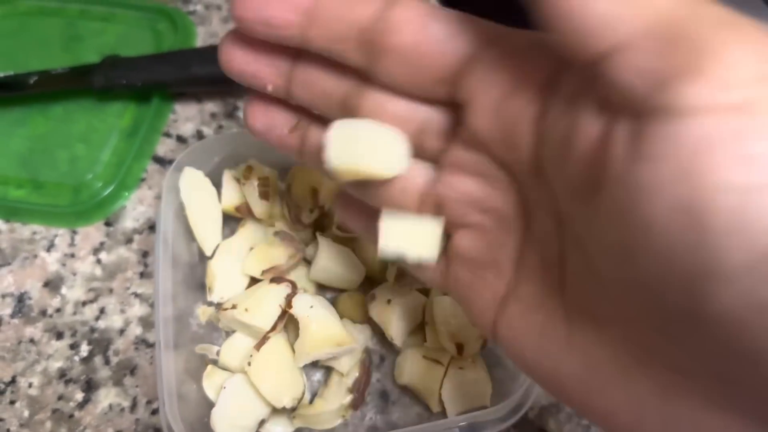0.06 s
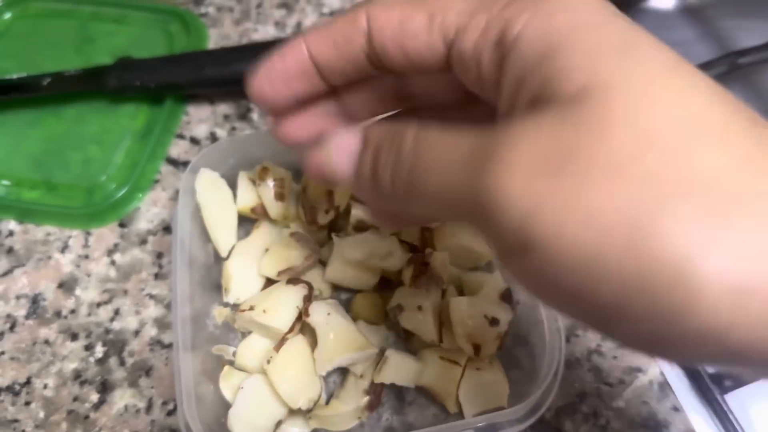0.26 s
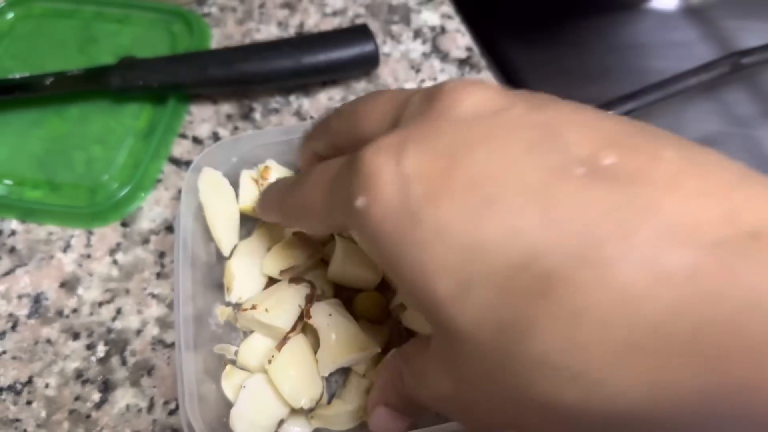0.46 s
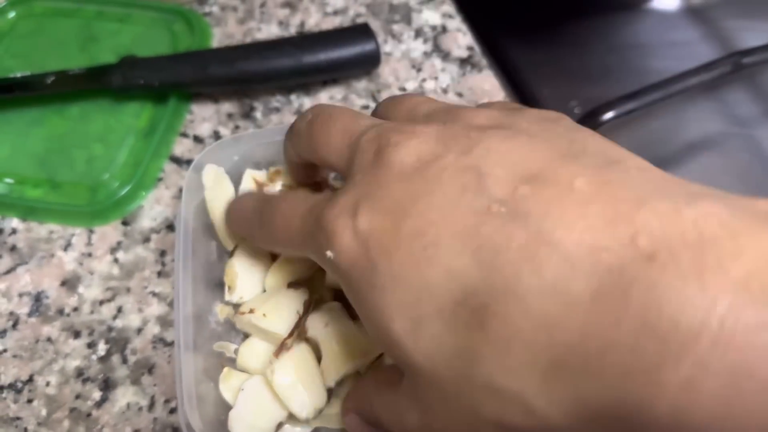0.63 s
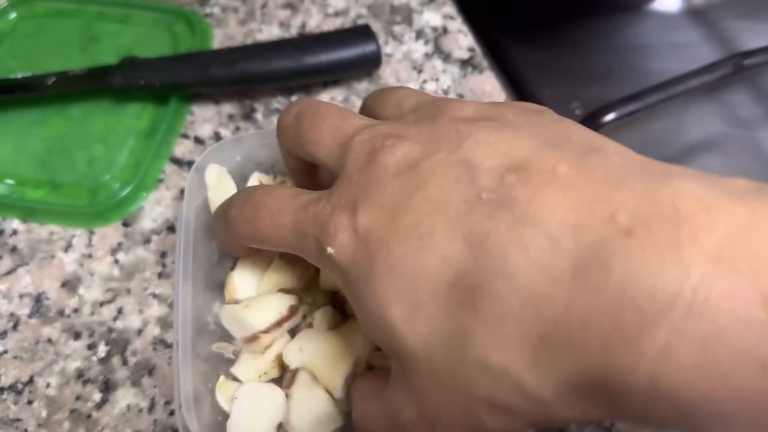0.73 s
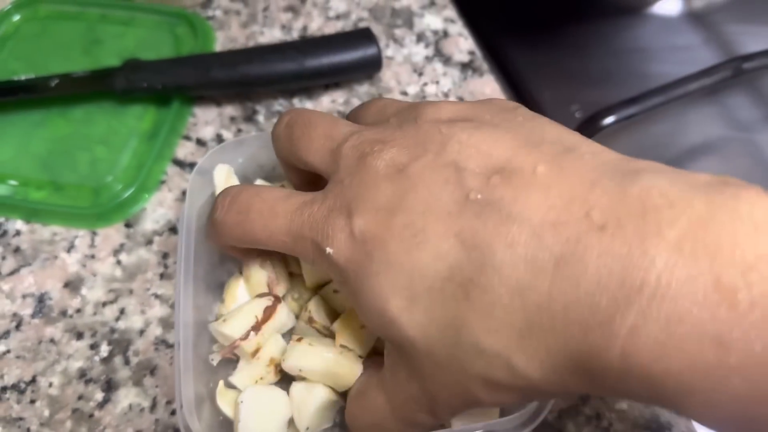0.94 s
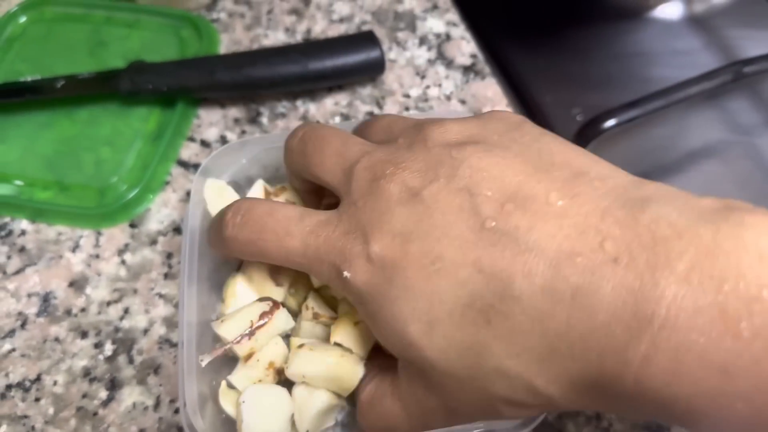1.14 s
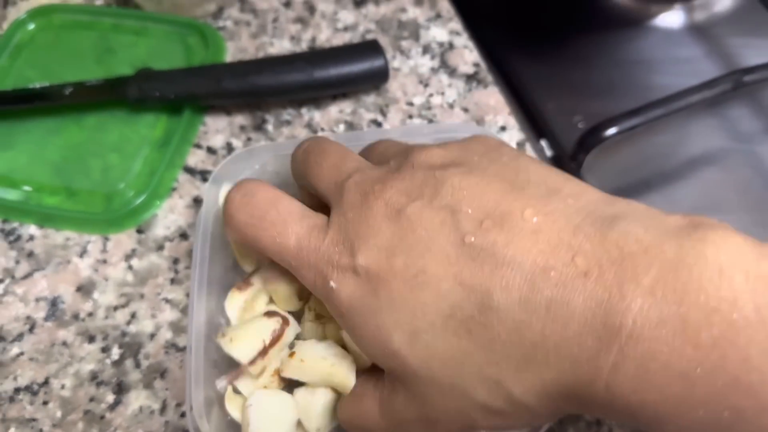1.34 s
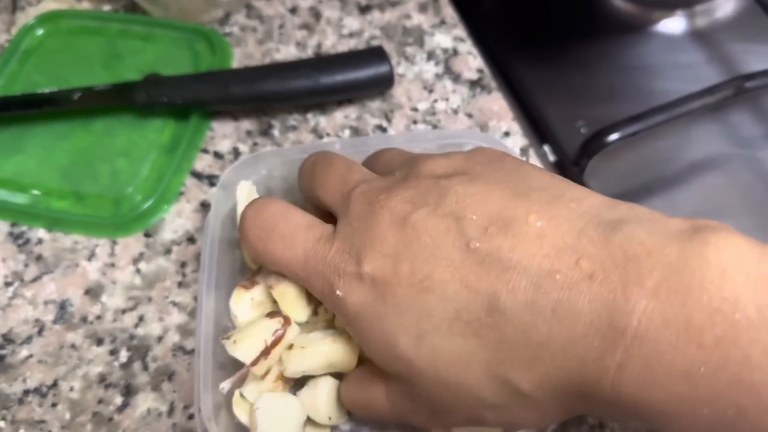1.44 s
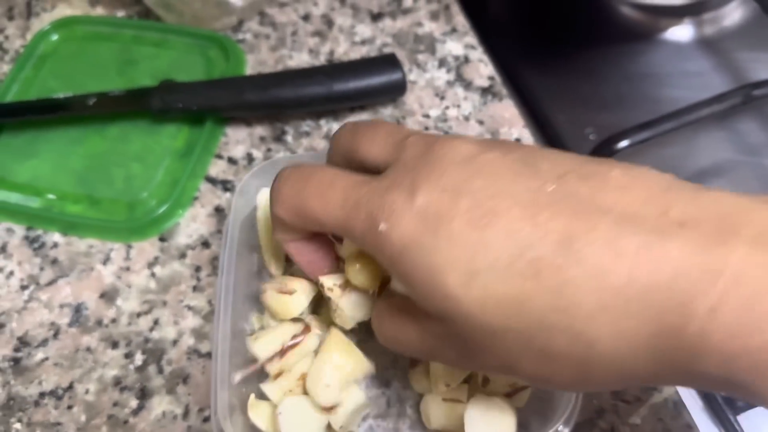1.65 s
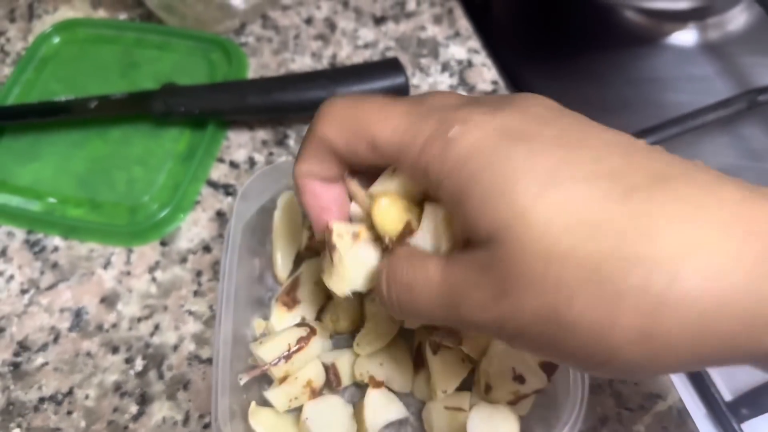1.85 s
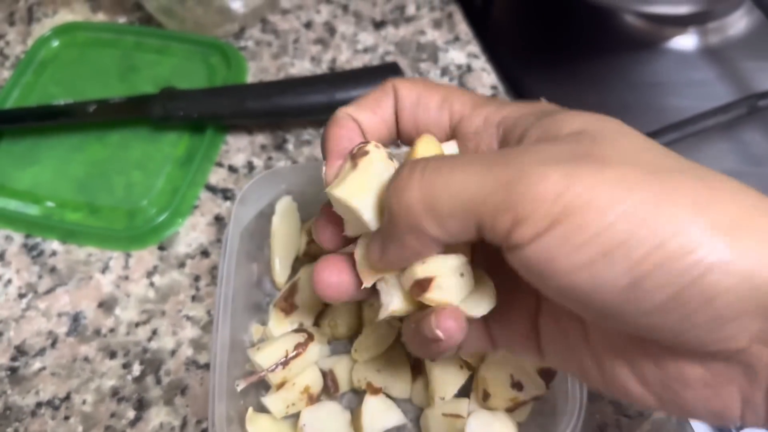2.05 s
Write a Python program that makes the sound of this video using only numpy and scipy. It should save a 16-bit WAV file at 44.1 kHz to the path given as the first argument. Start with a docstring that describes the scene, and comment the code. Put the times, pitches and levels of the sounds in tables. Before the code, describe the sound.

Hard cut seed pieces knock and rattle in a plastic tub as a hand stirs them

```python
"""A short scrape and small knocks come first, over a steady hiss and hum; hard knocks follow from 0.2 s. Hard
pieces of cut seed are dropped into a plastic tub, stirred by hand and scooped up in a kitchen. Each knock rings
the low notes (modes) of the tub; strong knocks also open with a thud. Scrapes are noise through the wall's
resonances, clicks are bright noise bursts, the room is shaped noise. A few pieces strike the wall, which rings
out a fading note, and dry ticks are very short noise bursts."""
import sys
import numpy as np
from scipy import signal
from scipy.fft import rfft, irfft, next_fast_len
from scipy.io import wavfile
from scipy.ndimage import uniform_filter1d, map_coordinates

SR = 44100
rng = np.random.default_rng(int(sys.argv[2]) if len(sys.argv) > 2 else 0)


def store_pcm(level_fs):
    """Save levels as 16-bit WAV."""
    pcm = np.round(np.clip(level_fs, -1, 1) * 32767).astype(np.int16)
    wavfile.write(sys.argv[1], SR, np.atleast_2d(pcm).T)


N = 92610  # length in samples: 2.1 s

# Steady hum and hiss of the kitchen, relative spectrum: (frequency [Hz], level [dB per Hz])
ROOM_SPECTRUM = [(20, -13), (40, -3.5), (120, -7.5), (157, 10.5), (260, -13), (620, -8.5), (1000, -24.5),
                 (2350, -12), (4000, -17.5), (6400, -9.5), (10000, -20), (15800, -21.5)]
# The stirring hand: (time [s], small knocks before SMALL_DB [dB], scrape [dB], clicks [dB],
# boom of the tub floor before a fixed lift [dB], favoured pitch [Hz])
STIRRING = [(0, -31, -26.5, -42, 0.5, 410), (0.078, -63, -47.5, -50.5, 13, 244),
            (0.184, -41.5, -50.5, -43.5, -2, 294), (0.215, -37.5, -25.5, -26.5, -3, 370),
            (0.293, -17.5, -31, -39.5, 1, 290), (0.353, -31.5, -45.5, -51, -8, 334),
            (0.63, -45, -47, -48, 8.5, 350), (0.643, -34, -35, -63, -3, 337),
            (.77, -25, -36, -43.5, -12, 355), (0.862, -26.5, -33.5, -41, 0, 336),
            (0.932, -27.5, -36.5, -45, 1.5, 260), (1.063, -19, -32, -30, -8, 273),
            (1.15, -30.5, -36, -40, 1.5, 240), (1.184, -20.5, -29.5, -33, -9, 410),
            (1.333, -26, -28, -37, -15.5, 375), (1.387, -29, -38, -42, 3, 235),
            (1.433, -20.5, -29.5, -37.5, -4.5, 306), (1.521, -23.5, -41.5, -46.5, -13.5, 420),
            (1.599, -45, -51.5, -47.5, -29, 294), (1.74, -32, -51.5, -49, -16, 350),
            (1.764, -26, -35, -45, -29, 390), (1.95, -38, -32.5, -40.5, 4, 225),
            (2.011, -41.5, -49, -39.5, -2, 194), (2.1, -67, -52, -39.5, 16, 200)]
# Broad part of the scrape, relative spectrum: (frequency [Hz], level [dB per Hz])
SCRAPE_SPECTRUM = [(500, -0.5), (800, -2.5), (2500, -19), (3900, -21.5), (5000, -43.5)]
# Resonances of the scraped wall: (frequency [Hz], relative level [dB])
WALL_RESONANCES = [(1090, 3), (1350, -0.5), (1630, -3.5), (1955, -7), (2290, -5.5), (2560, -5), (2820, -10),
                   (2970, -8), (3460, -10), (3705, -10)]
# Clicks of piece on piece, relative spectrum: (frequency [Hz], level [dB per Hz])
CLICK_SPECTRUM = [(3500, -13.5), (4700, -4.5), (6200, 1.5), (7300, 2), (8800, -10), (11000, -7),
                  (15800, -50.5)]
# Modes of the tub: (frequency [Hz], relative level [dB], time to fall by 60 dB [s])
TUB_MODES = [(61, -10, 0.32), (119.7, 1.5, 0.14), (160.1, -12.5, 0.72), (202.6, -1.5, 0.34),
             (261.4, 2.5, 0.17), (310.5, 5, 0.064), (379.7, 1, 0.17), (407, -1.5, 0.16), (482.9, -5, 0.24),
             (618.7, -8.5, 0.16), (846.7, -11.5, 0.16)]
# Pieces striking the wall, each ringing out one note: (time [s], frequency [Hz], level [dB])
WALL_PINGS = [(.001, 1670, -38.5), (0.193, 1192, -40.5), (0.232, 1052, -29), (.643, 1930, -39.5),
              (1.181, 5550, -32), (1.195, 6060, -31), (1.399, 3684, -34.5), (1.932, 1094, -31.5)]
# The strongest knocks: (time [s], thud level before the ports [dB], favoured pitch [Hz])
STRONG_KNOCKS = [(0.211, -6.5, 383), (0.2176, -7.5, 379), (0.232, -8, 256), (0.239, -7.5, 332),
                 (0.251, -14, 274), (0.26, -13.5, 276), (0.283, -15, 295), (0.642, -22, 351),
                 (.823, -21.5, 262), (0.843, -18, 284), (.859, -15.5, 319), (0.874, -20.5, 400),
                 (.895, -20, 363), (0.917, -18, 137), (1.005, -17, 269), (1.052, -22, 260),
                 (1.067, -17, 277), (1.164, -18.5, 250.5), (1.222, -23.5, 394), (1.282, -17, 314),
                 (1.318, -20.5, 361), (1.397, -19.5, 310), (1.433, -19, 259), (1.472, -18.5, 382),
                 (1.767, -26, 370), (1.806, -25, 373), (1.854, -25, 402)]
# Dry ticks of one piece on another: (time [s], centre frequency [Hz], level [dB])
DRY_TICKS = [(0.484, 2000, -33), (0.766, 3800, -31), (1.694, 630, -32.5)]
# The two microphone ports: (frequency [Hz], likeness [0-1], left phase lead [radians], left minus right [dB])
PORT_RESPONSE = [(130, 1, 0, .7), (350, .99, 0, 4), (480, .85, .5, 5), (750, .5, 1.9, 3), (1050, .4, 3, -4),
                 (1300, .15, 5, 1), (1900, .85, 6.28, -.5), (2800, .15, 5.3, -1.5), (4500, .3, 5.2, 0),
                 (5500, .78, 6.9, .4), (9000, .6, 8.2, .3), (10300, 1, 3 * np.pi, 0),
                 (14300, 1, 3 * np.pi, 0), (15800, .4, 10.3, 0)]

ROOM_DB = -40.5
WALL_WIDTH_HZ, WALL_WANDER_DB = 30, 3
LIFT_S, LIFT_BRIGHT = 1.5, 2.6  # from this time scooping up adds this much upper scrape
CLICK_PER_S, CLICK_T60_S, CLICK_SPREAD_DB = 250, 0.05, 3
CLICK_BED = 1  # steady part that the room smears, next to bursts of average strength 1
FAVOUR_OCT = 0.58  # distance from the favoured pitch where a mode is 6 dB weaker [octaves]
SCATTER_DB = 3.5  # random difference from blow to blow
CONTACT_S = 0.0022  # time constant of a soft start
BOOM_HZ = 140  # modes below this follow the boom level
SMALL_DB, SMALL_PER_S, SMALL_SPREAD_DB = -11, 400, 2.5
PING_T60_S, PING_T60_HZ = 0.33, 1210  # fall time at this pitch; higher notes fade sooner
PING_ROUGH = 0.89  # share of random flutter in a ringing note
KNOCK_DB, BOOM_DB = -12.5, 5.5  # offsets of the lasting ring under the thud
THUD_T60_S, THUD_RISE_S = 0.053, 0.0027  # damped by the heap of pieces
LOW_CUT_HZ, TOP_HZ = 42, 15850
CEILING = 0.93  # soft limit, full scale is 1


def amp(db):
    """Turn decibels into a plain multiplier."""
    return 10 ** (np.asarray(db) / 20)


def unit(x):
    """Scale a signal to an average (RMS) strength of 1."""
    return x / np.sqrt(np.mean(x ** 2) + 1e-20)


def along(points, hz):
    """Read table columns between their frequencies, on a log axis."""
    table_hz, *columns = np.transpose(points)
    return [np.interp(np.log(hz + 1), np.log(table_hz + 1), column) for column in columns]


def filtered(x, response):
    """Multiply the spectrum of x by a function of frequency."""
    size = next_fast_len(N + SR // 2)
    spectrum = rfft(x, size) * response(np.fft.rfftfreq(size, 1 / SR))
    return irfft(spectrum, size)[..., :N]


def hand(column, s=None):
    """Read one stirring column at given times, or once per sample."""
    rows = np.array(STIRRING)
    times = np.arange(N) / SR if s is None else s
    return np.interp(times, rows[:, 0], rows[:, column])


def patchy(patchy_db, size=256):
    """Make two noises that share patches of random gain in time and pitch."""
    noise = signal.stft(rng.standard_normal((2, N)), nperseg=size)[2]
    across_pitch = uniform_filter1d(rng.standard_normal(noise.shape[1:]), 3, 0)
    patches = uniform_filter1d(across_pitch, 8, 1)
    return signal.istft(noise * amp(patchy_db * unit(patches)), nperseg=size)[1][:, :N]


def chance_times(per_s):
    """Pick irregular moments, each with a random size around zero, at most 2."""
    draw = rng.random((1000, 2))
    s = np.cumsum(-np.log(draw[:, 0]) / per_s)
    inside = s < N / SR
    return s[inside], np.minimum(-np.log(draw[inside, 1]) - 1, 2)


def room():
    """Steady kitchen hum and hiss: noise with a fixed spectrum."""
    shaped = filtered(patchy(patchy_db=-0.5), lambda f: amp(along(ROOM_SPECTRUM, f)[0]))
    return amp(ROOM_DB) * unit(shaped)


def scrape():
    """Pieces slide along the wall: rubbing noise excites its resonances."""
    x = filtered(patchy(patchy_db=1.5), lambda f: amp(along(SCRAPE_SPECTRUM, f)[0]))
    for hz, db in WALL_RESONANCES:
        # each resonance comes and goes as the hand damps the wall: 13 random points per second
        wander = map_coordinates(rng.standard_normal(30), [np.arange(N) * 13 / SR])
        rubbing = amp(db + WALL_WANDER_DB * wander) * rng.standard_normal((2, N))
        peak = lambda f: 1j * f * WALL_WIDTH_HZ / (hz * hz - f * f + 1j * f * WALL_WIDTH_HZ)
        x = x + filtered(rubbing, peak)
    upper = filtered(x, lambda f: 1 / (1 + (2400 / (f + 1)) ** 4))
    lifting = np.arange(N) > LIFT_S * SR
    return amp(hand(2)) * unit(x + LIFT_BRIGHT * upper * lifting)


def bursts(per_s, spread_db, t60):
    """Sudden irregular contacts, each dying away, as one envelope."""
    s, size = chance_times(per_s)
    hits = np.bincount((s * SR).astype(int), amp(spread_db * size), N)
    fade = amp(-60 * np.arange(SR // 5) / SR / t60)
    return unit(signal.fftconvolve(hits, fade)[:N])


def clicks():
    """Pieces tick against each other: short bright noise bursts over their own smear."""
    level = CLICK_BED + bursts(CLICK_PER_S, CLICK_SPREAD_DB, CLICK_T60_S)
    noise = level * patchy(patchy_db=3.0, size=512)
    return amp(hand(3)) * unit(filtered(noise, lambda f: amp(along(CLICK_SPECTRUM, f)[0])))


def ring(s, db, pitch_hz, boom_db, push):
    """Blows set off fading tub modes, heard on a direct and an unrelated path."""
    out, t = np.zeros((2, N)), np.arange(SR // 2) / SR
    draw = rng.standard_normal((len(s), len(TUB_MODES), 2))
    at = np.clip(np.round(s * SR).astype(int), 0, N - 1)
    direct_sign = np.sign(draw[:, 0, 1] + push)  # a large push makes all blows go inward
    for k, (hz, level_db, t60) in enumerate(TUB_MODES):
        # modes under 550 Hz weaken away from the favoured pitch
        near_db = -6 * (np.log2(hz / pitch_hz) / FAVOUR_OCT) ** 2 * (hz < 550)
        place_db = boom_db if hz < BOOM_HZ else near_db
        size = amp(db + level_db + SCATTER_DB * draw[:, k, 0] + place_db)
        blows = np.array([np.bincount(at, size * w, N) for w in (direct_sign, draw[:, k, 1])])
        mode = amp(-60 * t / t60) * np.sin(2 * np.pi * hz * t) * (1 - np.exp(-t / CONTACT_S))
        out += signal.fftconvolve(blows, mode[None], axes=1)[:, :N]
    return out


def small_knocks():
    """Many small blows ring the tub while the hand stirs."""
    s, size = chance_times(SMALL_PER_S)
    pitch_hz = hand(5, s) * np.exp(0.14 * rng.standard_normal(1000)[:len(s)])
    db = hand(1, s) + SMALL_DB + SMALL_SPREAD_DB * size
    return ring(s, db, pitch_hz, hand(4, s) + 4, push=0)


def pings():
    """A piece strikes the wall and one note rings: a fading sine with random flutter in its level."""
    out, t = np.zeros((2, N + SR)), np.arange(SR // 3) / SR
    for s, hz, db in WALL_PINGS:
        rough = PING_ROUGH * unit(uniform_filter1d(rng.standard_normal((2, len(t))), 150))
        phase = 2 * np.pi * (hz * t + rng.random((2, 1)))
        t60 = PING_T60_S * (PING_T60_HZ / hz) ** 0.43
        fade = amp(db - 60 * t / t60) * (1 - np.exp(-t / CONTACT_S))
        start = round(s * SR)
        out[:, start:start + len(t)] += fade * (1 + rough) * np.sin(phase)
    return out[:, :N]


def thuds(s, db, pitch_hz):
    """A few damped cycles at the favoured pitch open every strong knock."""
    out, t = np.zeros((2, N + SR)), np.arange(SR // 5) / SR
    shape = amp(-60 * t / THUD_T60_S) * (1 - np.exp(-t / THUD_RISE_S))
    shape = shape / shape.max()
    for at, level_db, hz in zip(np.round(s * SR).astype(int), db, pitch_hz):
        out[0, at:at + len(t)] += amp(level_db) * shape * np.sin(2 * np.pi * hz * t)  # direct path only
    return out[:, :N]


def strong_knocks():
    """Hard blows: a short thud with the longer ring of the tub under it."""
    s, db, pitch_hz = np.transpose(STRONG_KNOCKS)
    lasting = ring(s, db + KNOCK_DB, pitch_hz, hand(4, s) + BOOM_DB, push=10)
    return lasting + thuds(s, db, pitch_hz)


def ticks():
    """One piece hits another: broad noise that falls by 60 dB in 20 ms."""
    out, t = np.zeros((2, N)), np.arange(SR // 20) / SR
    for s, hz, db in DRY_TICKS:
        band = signal.butter(2, [hz / 2, hz * 1.5], "band", fs=SR)
        burst = signal.lfilter(*band, rng.standard_normal((2, len(t))))
        start = round(s * SR)
        out[:, start:start + len(t)] += amp(db - 60 * t / 0.02) * unit(burst)
    return out[:, :N]


def ports(f):
    """Mix the direct and unrelated paths into left and right, by frequency."""
    alike, lead, balance_db = along(PORT_RESPONSE, f)
    turn = np.arccos(np.clip(alike, 0, 1)) / 2  # more of the unrelated path makes the sides less alike
    left = amp(balance_db / 2) * np.exp(0.5j * lead)
    right = amp(-balance_db / 2) * np.exp(-0.5j * lead)
    return np.array([[left * np.cos(turn), left * np.sin(turn)],
                     [right * np.cos(turn), -right * np.sin(turn)]])


def scene():
    """Add all sources and pass them through the two ports."""
    tub = small_knocks() + strong_knocks()
    pieces = scrape() + clicks() + pings() + ticks()
    return filtered(room() + tub + pieces, ports).sum(axis=1)


def record(dry):
    """Cut the deep bass, round off the highest peaks and remove the top treble."""
    x = filtered(dry, lambda hz: 1 / (1 + (LOW_CUT_HZ / (hz + 1)) ** 4))
    x = x / (1 + np.abs(x / CEILING) ** 6) ** (1 / 6)
    return filtered(x, lambda hz: hz < TOP_HZ)


dry = scene()
out = record(dry)
store_pcm(out)
```